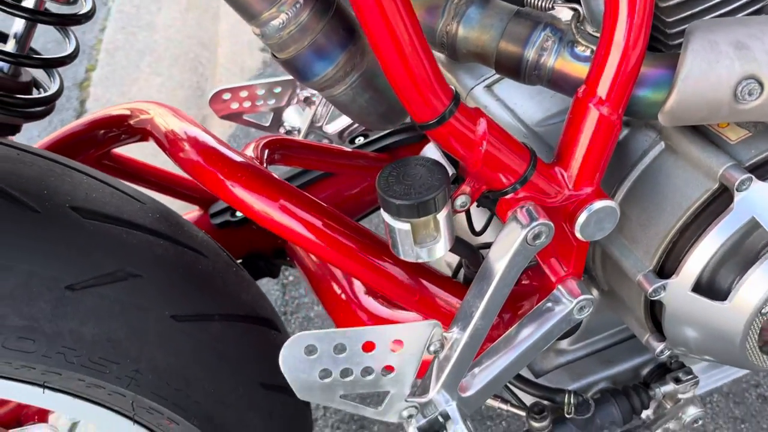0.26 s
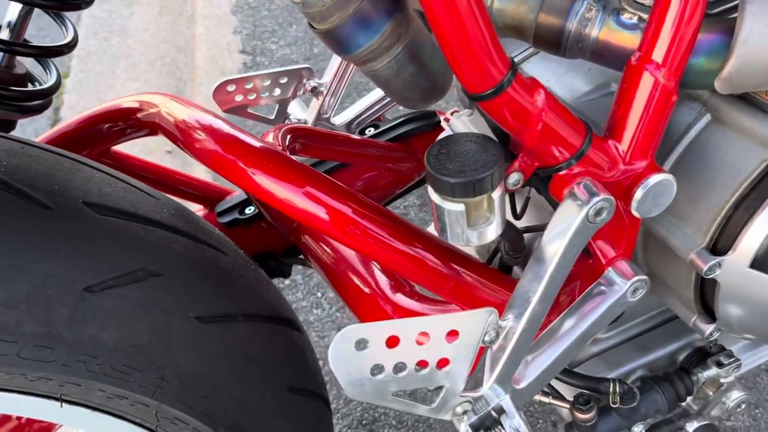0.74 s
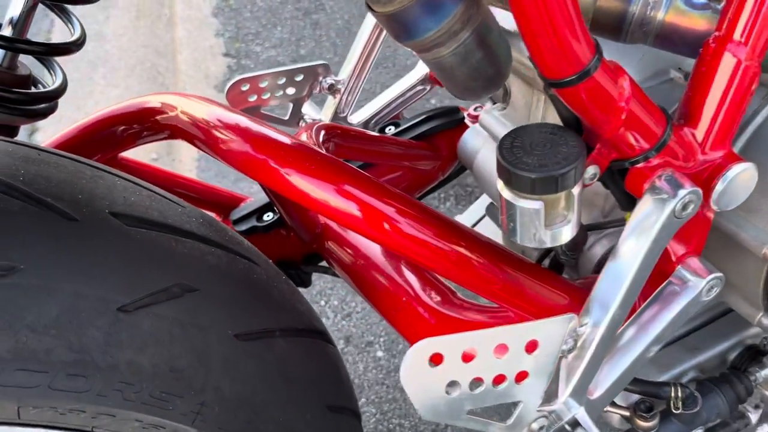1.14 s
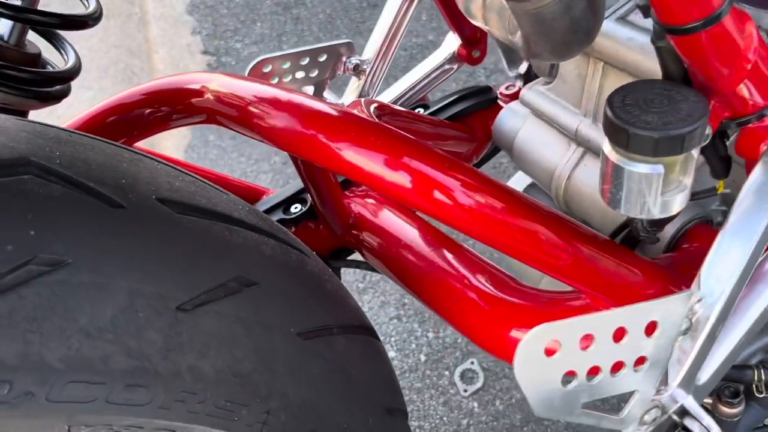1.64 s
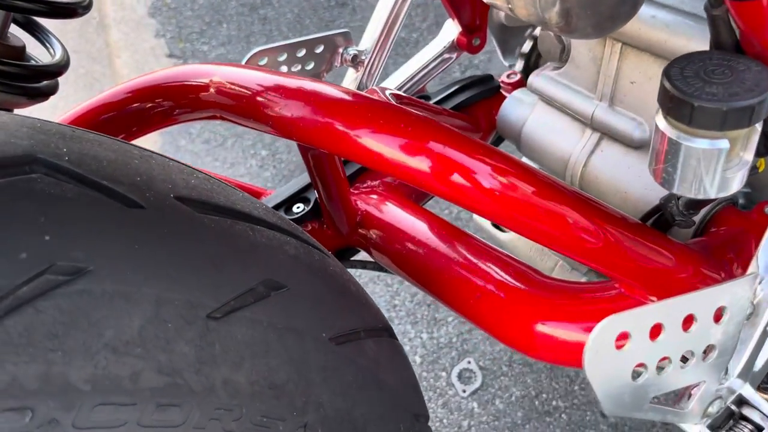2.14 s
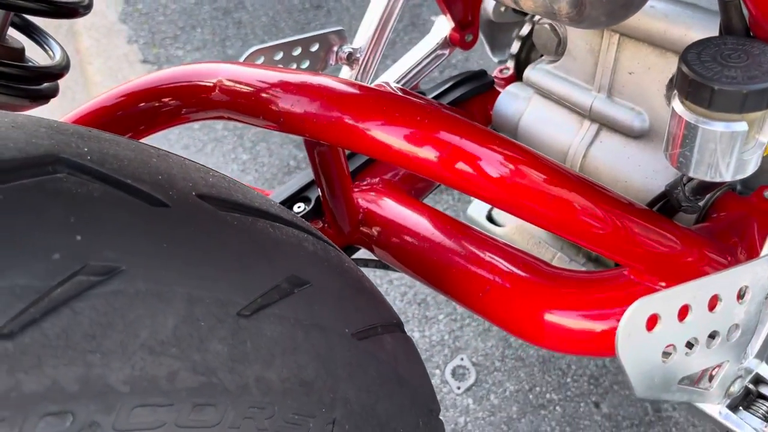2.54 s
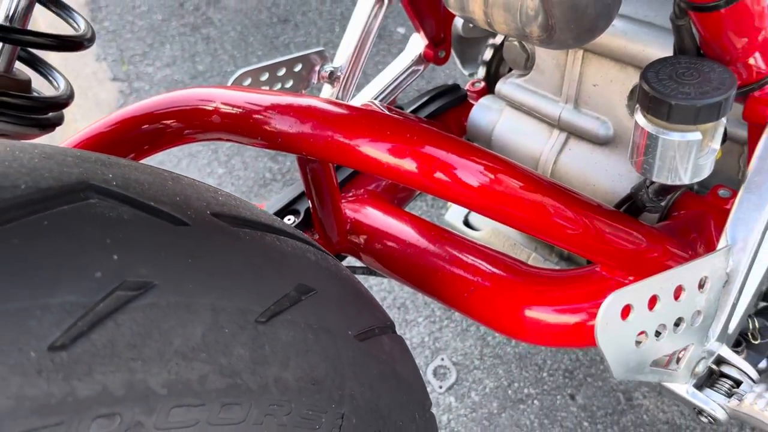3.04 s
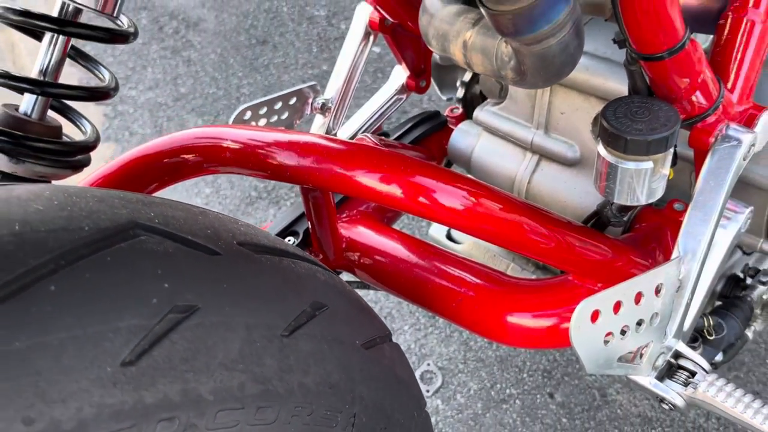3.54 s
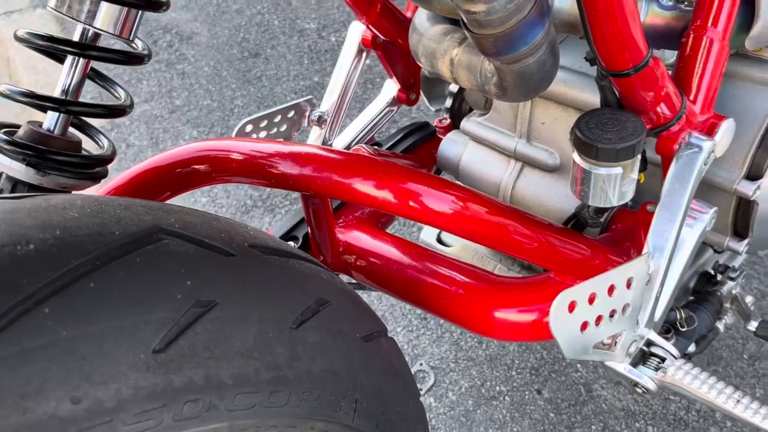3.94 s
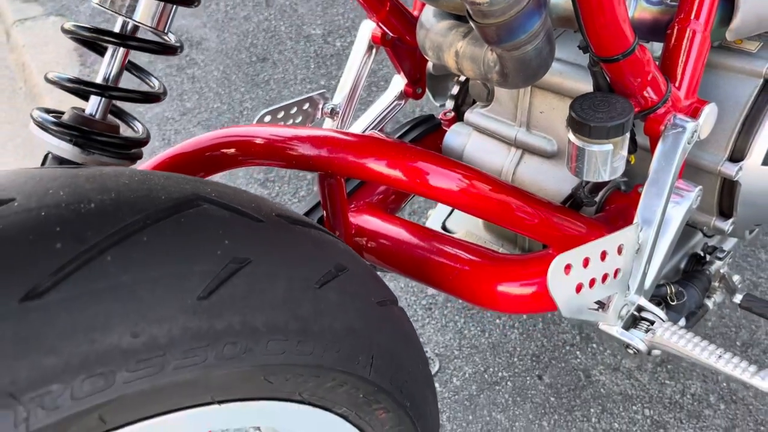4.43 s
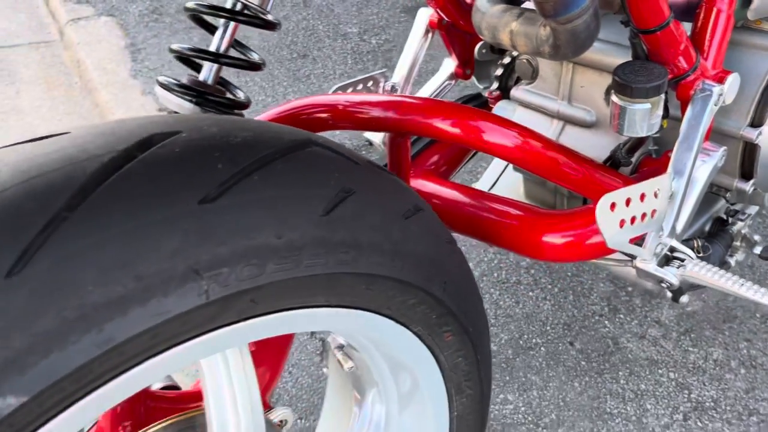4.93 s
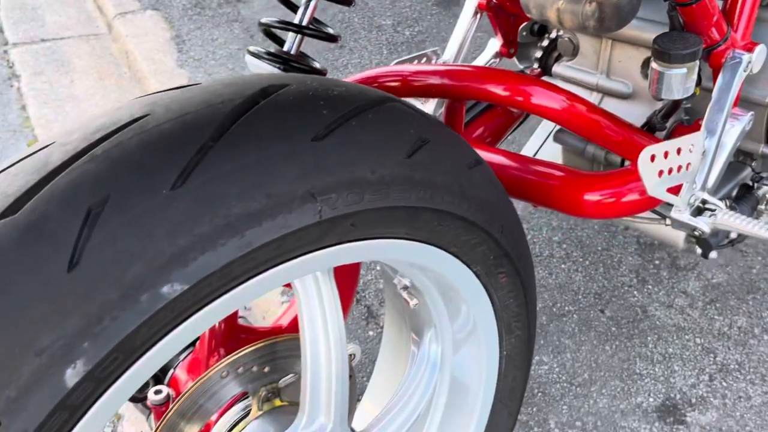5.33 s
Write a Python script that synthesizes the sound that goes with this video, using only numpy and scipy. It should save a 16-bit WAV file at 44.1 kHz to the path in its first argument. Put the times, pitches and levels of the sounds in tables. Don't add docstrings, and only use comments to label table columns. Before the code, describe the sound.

Outdoors by a parked motorcycle, a twin-cylinder engine idles unevenly, with low exhaust booms and rough puffs of gas, some weak or missing. Dry clutch plates and valve gear clack several times per cycle over a metallic whirr and faint high whine. A close stereo handheld microphone drifts from engine to silencer, so the exhaust gradually gets stronger.

```python
import sys
import numpy as np
from scipy import signal
from scipy.fft import rfft, irfft
from scipy.io import wavfile
from scipy.ndimage import uniform_filter1d

SR = 44100
rng = np.random.default_rng(int(sys.argv[2]) if len(sys.argv) > 2 else 0)


def dump(signal):
    limited = np.clip(np.atleast_2d(signal).T, -1, 1)
    pcm = np.round(limited * 32767).astype(np.int16)
    wavfile.write(sys.argv[1], SR, pcm)


def makeup_ratio(level_db):
    decades = np.asarray(level_db, float) / 20
    return 10 ** decades


N = 246078
FREQ = np.arange(N // 2 + 1) * SR / N + 1e-9

# start in seconds, first pitch in Hz, settled pitch in Hz,
# glide in seconds, rise in seconds, time to fall 60 dB in seconds, signed size.
FRONT_PIPE = [
    [(-.0002, 288.8, 61.33, .0053, .0145, .1762, 1.26), (-.0001, 284.2, 106.5, .0027, .027, .195, -.22)],
    [(-.0028, 387.9, 68.7, .0045, .0099, .0279, -2.12), (-.0034, 462.7, 204.8, .0032, .0005, .128, -.02)],
]
# start in seconds, first pitch in Hz, settled pitch in Hz,
# glide in seconds, rise in seconds, time to fall 60 dB in seconds, signed size.
REAR_PIPE = [
    [(-.0044, 343.2, 90.5, .001, .0301, .0949, .58), (-.0034, 146.1, 61.13, .0097, .0182, .0654, -1.25)],
    [(-.0047, 489.4, 161.3, .0011, .0021, .0843, -.91), (-.0073, 257.1, 222.3, .0033, .0038, .0712, .71)],
]
# frequency in Hz, level in dB per Hz.
GAS_ROAR = [(30, -12), (50, -5), (120, 4.5), (160, 0.5), (260, -3), (330, -16.5), (450, -12.5)]
# frequency in Hz, level in dB.
FAR_SHADE = [(25, 11), (60, -1.9), (95, -1.3), (160, -7), (230, -3), (340, 2.5), (900, 9)]
# front firing in seconds, front burn in dB, # delay of
# the rear firing in milliseconds, rear burn in dB.
ENGINE_CYCLES = [(-.057, -3, 40.5, -1), (.0545, -3, 40.9, 0), (.1648, -3.5, 42.8, 0), (.3868, -7, 44.8, .5),
                 (.6066, -4.5, 42.9, 0), (.8357, 0, 42.4, 0), (1.0624, 0, 42.2, 0), (1.1725, -1, 39.8, -2.5),
                 (1.2807, -3, 41, 0), (1.5027, -1.5, 42.4, -1), (1.7354, -2, 38.7, 0), (1.9428, 0, 36.5, .5),
                 (2.2402, -7, 39.9, 0), (2.4502, -5.5, 41.8, 0), (2.6697, -2, 39.4, 0),
                 (3.0882, -1.5, 38.9, 0), (3.2982, -2, 40.9, 0), (3.5227, -3, 38, 0), (3.7393, -1, 38.5, 0),
                 (3.9395, -1, 37.3, -.5), (4.15, -1, 39.6, 0), (4.369, 0, 38.1, 0), (4.5844, -.5, 38.9, -.5),
                 (4.6891, -10.5, 42, -2), (4.8006, 0, 37.3, -1), (4.9, -10, 41.3, -2.5),
                 (5.0109, 0, 40.1, .5), (5.2361, -2.5, 42, 1.5), (5.4532, -1.5, 42, 1)]
# front firing in seconds, front burn in dB, #
# delay of the rear firing in milliseconds, rear burn in dB.
MORE_CYCLES = [(.2765, 1, 38, -13), (.4997, 1.5, 34, -13), (.7183, -2, 42.4, -3), (.9449, -2, 39, -19),
               (1.3869, -3, 50, -16), (1.6117, -13, 41, -23), (1.8343, -13, 39, -10),
               (2.0347, -12, 48, -14), (2.1402, .5, 36.9, -3), (2.3438, -1, 34.5, -19),
               (2.5544, -7, 50, -17), (2.7694, -15, 41.7, -4), (2.8789, -1, 37.8, -3),
               (2.9799, -3.5, 39, -13), (3.1875, -8.5, 48, -15), (3.408, -24, 47, -18),
               (3.6352, -21, 24, -22), (3.8328, -19, 49, -14), (4.0357, -30, 51, -14), (4.266, -34, 29, -9),
               (4.4682, -19, 51, -16), (5.1173, -3, 40.3, -12), (5.3414, -2, 49, -12), (5.5608, -1, 41, 0)]
# time after the front firing in seconds, peak level in dB,
# then dB per dB of the last rear burn, of the front burn and of the coming rear burn.
VALVE_BLOWS = [
    (-.035, -24.5, 0, .1, .01),
    (-.019, -13.5, -.15, 0.38, 0.0089),
    (.0095, -16.5, -0.05, .05, .01),
    (0.0214, -12.5, -0.11, 0.1, 0.25),
    (.043, -24.5, -0.3, .1, 0.26),
]
# frequency in Hz, level in dB per Hz.
SHARED_TONE = [(180, -15.5), (300, -10.5), (674, -15.5), (1000, -9), (1110, -14), (1350, -6.5),
               (1670, -13.5), (2220, -8), (3240, -10), (3700, -14.5), (4080, -11.5), (6700, -13.5),
               (7650, -23.5), (11800, -13.5), (15600, -33)]
# frequency in Hz, level in dB per Hz.
DIFFERENCE_TONE = [(300, -22), (460, -11.5), (690, -14.5), (900, -12.5), (1390, -8.5), (1940, -18),
                   (2930, -9), (5230, -15), (6700, -17), (7400, -16.5), (9200, -16.5), (9800, -15.5),
                   (11800, -31), (15600, -20.5)]
# frequency in Hz, width in Hz,
# level in dB in the shared sound, level in dB in the difference.
CASE_RINGS = [(471.7, 17, 10, 7), (561, 105, 7.5, 1), (1010, 47, 4.5, -9), (2247, 53, 4.5, -6.5),
              (3610, 39, 10, -3), (6780, 53, 4.5, 2), (8480, 1220, 11, 21.5), (10730, 230, 2, 3),
              (13200, 330, -2, 0)]
# frequency in Hz, share in step,
# share a quarter cycle ahead.
STEREO_LINK = [(300, 0.93, 0.85), (544, 0.51, 0.15), (776, -0.2, -0.3), (1530, -0.4, -0.55),
               (1850, 0.39, -0.54), (2760, 0.63, -0.4), (4500, 0.18, .15), (5430, -0.23, -.45),
               (7500, -0.13, -.55), (9300, 0.038, 0.8), (10700, -0.21, .6), (13500, -0.052, -.35)]
# frequency in Hz, width in Hz, level in dB.
WHIRR_RINGS = [(2280, 130, -14), (3650, 220, 8), (6674, 390, 12.5), (8200, 340, 8.5)]
# time in seconds, pitch in Hz, level in dB.
PUMP_WHINE = [
    (0, 3620, -51),
    (1, 3648, -38),
    (2, 3610, -44.5),
    (2.7, 3577, -38.5),
    (3.398, 3760, -40),
    (4, 3660, -35.5),
    (4.698, 3640, -41.5),
    (5.58, 3640, -61),
]
# time in seconds, nearness of the silencer in dB,
# buzz of the clutch cover in dB, left minus right in dB.
PHONE_PATH = [
    (0, -13.5, -27.5, 1.5),
    (1, -12.5, -27.5, 0),
    (1.801, -9, -54.5, 0.5),
    (2.5, -8.2, -51.5, -1),
    (3.2, -7.5, -57, 2.5),
    (3.75, -6.5, -30, 5.5),
    (4.6, -6, -33, 7.5),
    (5, -4.5, -30.5, 2),
    (5.3, -2.5, -36, 2.5),
    (5.58, -3, -34, 1),
]


def exhaust():
    front_s, front_db, rear_s, rear_db = cycles()
    front = cylinder(front_s, front_db, (-1.5, 15.5), FRONT_PIPE)
    rear = cylinder(rear_s, rear_db, (14.5, 0.2), REAR_PIPE)
    pipes = front + rear
    slow_power = uniform_filter1d(pipes ** 2, SR // 2)
    quick_power = uniform_filter1d(pipes ** 2, SR // 40)
    swell = np.sqrt(quick_power + makeup_ratio(1.5) * slow_power)
    gas = irfft(rfft(rng.standard_normal((2, N))) * makeup_ratio(colour(GAS_ROAR)), N)
    gas = makeup_ratio(-13) * swell * gas / gas.std()
    shade = makeup_ratio(colour(FAR_SHADE)) * np.exp(-2j * np.pi * FREQ * .00052 - .22j)
    left = pipes + gas[0]
    right = irfft(rfft(left) * shade, N) + makeup_ratio(-8) * gas[1]
    return np.array([left, right])


def cylinder(s, burn_db, full_db, pipe):
    near_db = phone(s)[0]
    boom_db = full_db[0] + 0.65 * near_db + 0.41 * burn_db
    misfire_db = 1.6 * np.minimum(burn_db + 8, 0)
    bark_db = full_db[1] + near_db + burn_db + misfire_db
    u = np.arange(SR // 4) / SR
    out = 0
    for db, rings in zip((boom_db, bark_db), pipe):
        for start, first_hz, hz, glide, rise, t60, size in rings:
            turns = hz * u + (first_hz - hz) * glide * (1 - np.exp(-u / glide))
            ring = (1 - np.exp(-u / rise)) * fade(rise, t60) * np.sin(2 * np.pi * turns)
            out = out + size * blows(s + start, db, ring)
    return out


def running_gear():
    plates, thuds = clacks()
    near_db, buzz_db, pan_db = phone(np.arange(N) / SR)
    sag_db = slack()
    whirr_db = sag_db - 37.2 - 0.13 * (buzz_db + 41) - 0.25 * (near_db + 9)
    hum_db = sag_db - 32.2 - 0.081 * (buzz_db + 41) + 0.18 * (near_db + 7)

    whirr_level = makeup_ratio(whirr_db + 2.3 * walk(40) - 0.04) * (0.71 + 0.83 * chatter(120, 12.0, 0.028))
    whirr_rings = makeup_ratio(sum(db * bump(hz, width) for hz, width, db in WHIRR_RINGS))
    whirr = rfft(whirr_level * grit(1.3)) * whirr_rings
    buzz = rfft(makeup_ratio(buzz_db + 3.9 * walk(60) - 2.5) * grit(2.2)) * bump(2110, 610)
    hum_level = makeup_ratio(hum_db + 0.93 * walk(30) - 2.5) * (0.83 + 0.48 * chatter(90, 13, 0.027))
    dull = thuds + rfft(hum_level * grit(1.9))

    upper = 1 / (1 + (1600 / FREQ) ** 4)
    shake = (plates + whirr) * np.sqrt(upper)
    shake = shake + buzz * makeup_ratio(6) + dull * np.sqrt(1 - upper) * makeup_ratio(9.5)

    rings = [[db * bump(hz, width) for db in dbs] for hz, width, *dbs in CASE_RINGS]
    tones = np.array([colour(SHARED_TONE), colour(DIFFERENCE_TONE)])
    sum_db, difference_db = tones + np.sum(rings, axis=0)
    hz, step, ahead = np.transpose(STEREO_LINK)
    link = np.interp(np.log(FREQ), np.log(hz), step) + 1j * np.interp(np.log(FREQ), np.log(hz), ahead)
    response = causal(sum_db) * makeup_ratio(9.5)
    own_share = np.sqrt(np.clip(1 - np.abs(link) ** 2, 0, 1))
    follow = link * shake[0] + own_share * shake[1]
    mid = irfft(response * shake[0], N)
    side = irfft(response * makeup_ratio(difference_db - sum_db - 0.5) * follow, N)
    return np.array([mid + side, mid - side]) * makeup_ratio(np.array([pan_db, -pan_db]) * 0.13)


def clacks():
    front_s, front_db, _, rear_db = cycles()
    burns = np.array([np.r_[0, rear_db[:-1]], front_db, rear_db])
    cycle_s, drag = .108, 1.83
    slow = 1 + drag * (np.diff(front_s, prepend=front_s[0] - cycle_s) / cycle_s - 1)
    bright = dull = 0
    for after, db, *per_burn in VALVE_BLOWS:
        chance = rng.standard_normal((len(front_s), 3)).T
        s = front_s + after * (slow if after < 0 else 1) + .0007 * chance[0]
        peak_db = db + per_burn @ burns - 0.44 * (phone(s)[0] + 9) + 1.4 * chance[1]
        thud_db = -9 - 0.47 * np.maximum(peak_db + 15, -6) + 1.5 * chance[2]
        crack = blows(s, peak_db - 2.0, fade(0.0003, 0.013))
        rattle = blows(s, peak_db + 0.55 * thud_db - 1.5, fade(0.0022, 0.045))
        thud = blows(s, peak_db + thud_db + 1.32, fade(0.0015, 0.057))
        rings = part(4.0)
        bright = bright + rings * rfft((crack + rattle) * grit(2.1))
        dull = dull + rings * rfft(thud * grit(3.0))
    tilt = makeup_ratio(3.7 * np.log2(FREQ / 5000))
    return bright * tilt, dull


def part(ring_db, count=40):
    hz, size = 700 * 12 ** rng.random(count), rng.random(count)
    db = ring_db * sum(g * bump(f, 40 + .03 * f) for f, g in zip(hz, size))
    return causal(db - np.mean(db[FREQ < 8000]) * (FREQ > 0))


def chatter(rate, spread_db, t60_s):
    when, size = rng.random((int(rate * N / SR), 2)).T
    ticks = blows(when * N / SR, spread_db * size, fade(0.00014, t60_s))
    return ticks / np.sqrt(np.mean(ticks ** 2))


def slack():
    front_s, _, _, rear_db = cycles()
    depth_db = 0.38 * np.minimum(np.r_[0, rear_db[:-1]], 0)
    corner_s = front_s[:, None] + (-0.038, -0.084, -0.032, -0.026)
    corner_db = np.outer(depth_db, [0, 1, 1, 0])
    return np.interp(np.arange(N) / SR, np.ravel(corner_s), np.ravel(corner_db))


def pump():
    s, *curves = np.transpose(PUMP_WHINE)
    hz, db = (np.interp(np.arange(N) / SR, s, c) for c in curves)
    turns = np.cumsum(hz + 20 * walk(40) + 135 * walk(500)) / SR
    tone = makeup_ratio(db - 2.5 + 4.5 * walk(60)) * np.sin(2 * np.pi * turns)
    return tone * makeup_ratio(np.array([[1.5], [-1.5]]))


def cycles():
    front_s, front_db, lag_ms, rear_db = np.transpose(sorted(ENGINE_CYCLES + MORE_CYCLES))
    return front_s, front_db, front_s + lag_ms / 1000, rear_db


def phone(s):
    at, *curves = np.transpose(PHONE_PATH)
    return [np.interp(s, at, c) for c in curves]


def colour(points):
    hz, db = np.transpose(points)
    hz = np.r_[hz[0] / 2, hz, hz[-1] * 1.03]
    return np.interp(np.log(FREQ), np.log(hz), np.r_[-90, db, -90])


def causal(db):
    cepstrum = irfft(np.log(makeup_ratio(db)), N)
    cepstrum[1:N // 2] *= 2
    cepstrum[N // 2 + 1:] = 0
    return np.exp(rfft(cepstrum))


def bump(hz, width):
    return 1 / (1 + (2 * (FREQ - hz) / width) ** 2)


def blows(s, db, shape):
    at = np.clip(s * SR, -SR, N) + SR
    whole = at.astype(int)
    train = np.zeros(N + 2 * SR)
    np.add.at(train, whole, makeup_ratio(db) * (1 - at + whole))
    np.add.at(train, whole + 1, makeup_ratio(db) * (at - whole))
    return signal.fftconvolve(train, shape)[SR:SR + N]


def fade(rise_s, t60_s):
    u = np.arange(SR // 4) / SR
    return (1 - np.exp(-u / rise_s)) * 1000 ** (-u / t60_s)


def grit(spread_db, channels=2):
    size = makeup_ratio(spread_db * np.minimum(rng.exponential(size=(channels, N)), 4))
    return rng.standard_normal((channels, N)) * size / np.sqrt(np.mean(size ** 2))


def walk(rate):
    k = int(SR / rate)
    steps = np.repeat(rng.standard_normal(N // k + 1), k)
    held = uniform_filter1d(steps, k)[:N]
    return held - uniform_filter1d(held, SR // 8)


def scene():
    return exhaust() + running_gear() + pump()


def top_cut(x):
    return signal.sosfilt(signal.butter(12, 15720, fs=SR, output="sos"), x)


def record(dry):
    return top_cut(dry)


dry = scene()
out = record(dry)
dump(out)
```